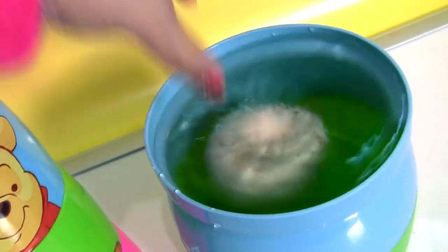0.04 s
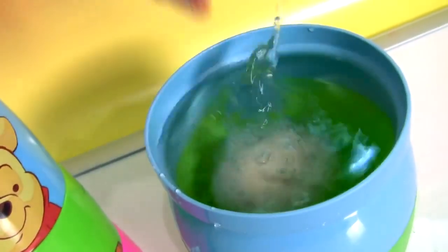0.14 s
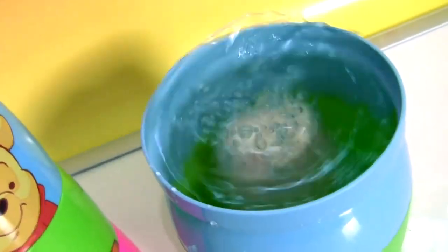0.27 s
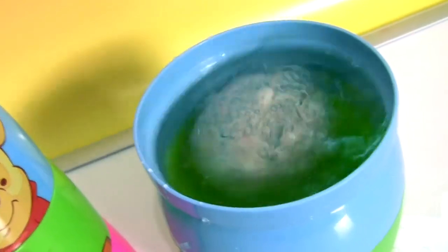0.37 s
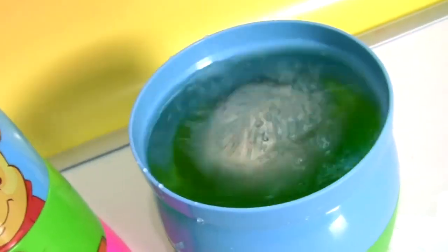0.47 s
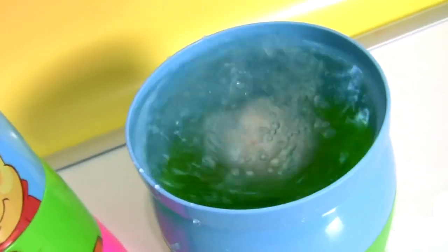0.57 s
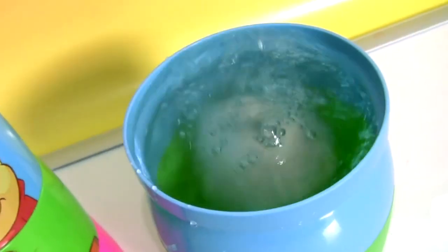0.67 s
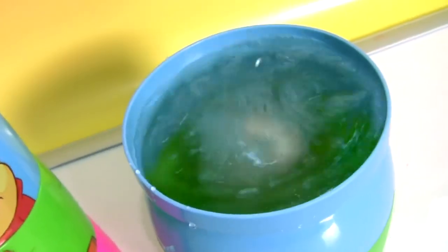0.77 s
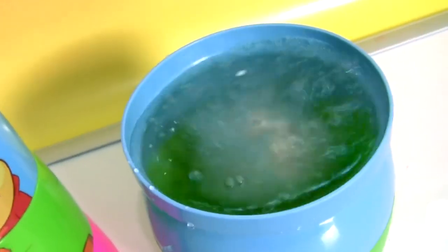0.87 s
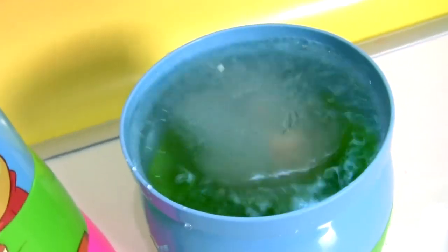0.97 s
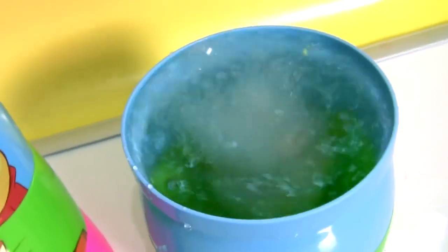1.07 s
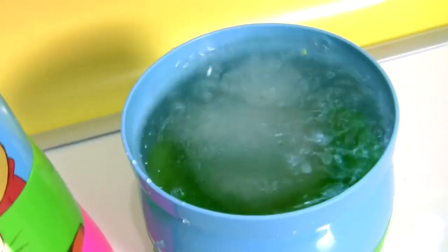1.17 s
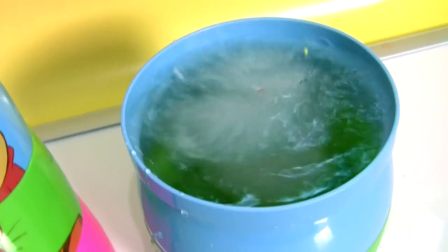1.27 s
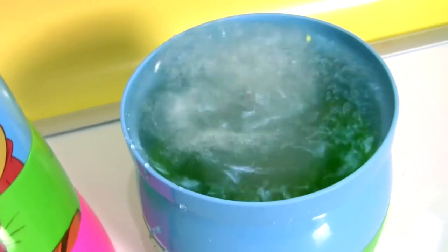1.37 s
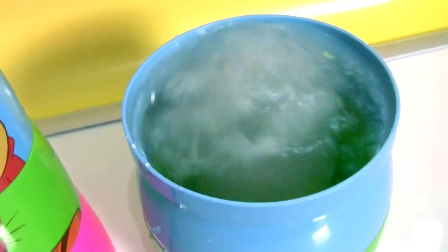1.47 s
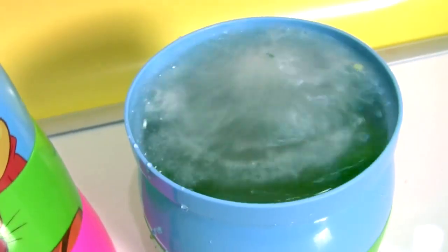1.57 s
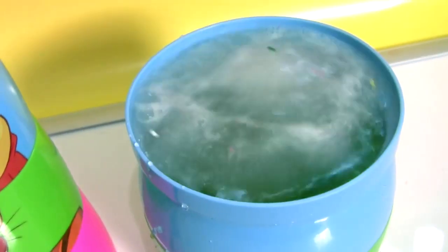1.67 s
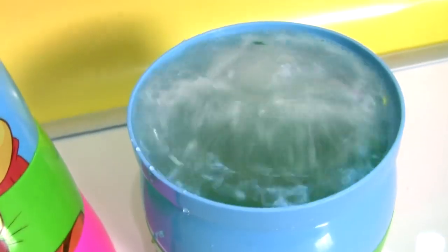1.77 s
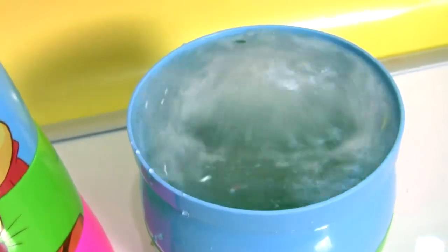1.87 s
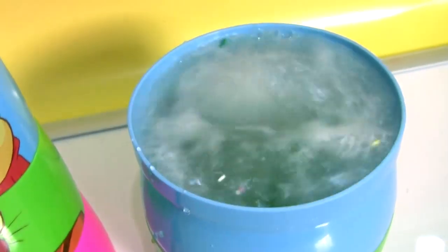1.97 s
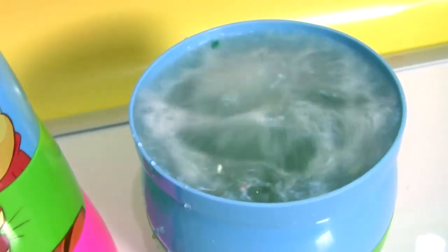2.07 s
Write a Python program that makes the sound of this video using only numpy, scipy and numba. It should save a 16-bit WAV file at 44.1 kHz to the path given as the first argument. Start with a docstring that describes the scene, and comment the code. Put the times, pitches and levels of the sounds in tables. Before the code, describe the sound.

Close up in a quiet small room, slightly to the right: a wet slap, a loud hollow plastic knock, lighter bumps and bubbly plops, tiny crackling pops, then a steadily thickening bright hiss.

```python
"""A small room, a plastic cup of water on a table, a little right of a close microphone.
A bath bomb slaps into the water and knocks on the bottom, then bumps a few more times: modes of cup and table ring.
Shaped noise makes slap and splashes; rising damped sines make single bubbles and gurgles.
Streams of tiny damped sines make the churning, the pops and a fizz that thickens.
Room reflections follow the cup and pops, over a soft room tone with three hollow resonances."""
import sys
import numpy as np
from scipy import signal
from scipy.fft import rfft, irfft
from scipy.io import wavfile
from scipy.ndimage import uniform_filter1d
from numba import njit

SR = 44100
rng = np.random.default_rng(int(sys.argv[2]) if len(sys.argv) > 2 else 0)


def to_wav(sig):
    """Store sig (one row per channel, or 1-D mono) as 16-bit WAV at the path in sys.argv[1].

    Samples outside -1..1 are clipped; the rate is SR.
    """
    pcm = np.clip(np.atleast_2d(sig), -1, 1) * 32767
    pcm = np.round(pcm).astype(np.int16)
    wavfile.write(sys.argv[1], SR, pcm.T)  # frames by channels


N = 92610
T = np.arange(N) / SR  # seconds

# Levels at the cup are set before the left-right balance and the recorder.
# room tone, spectrum of the rush: pitch_hz, level_db
ROOM_TONE_SPECTRUM = [(25, -5.5), (60, -1), (130, -0.5), (300, -5), (700, -10.5), (1500, -8), (2500, -16),
                      (7000, -29.5), (16000, -34.5)]
ROOM_TONE_DB = -62
# hollow resonances of the room: pitch_hz, width_hz, rms_level_db before the swell
ROOM_RESONANCES = [(293, 32, -63.5), (490, 73, -64.5), (733.4, 32, -64.5)]
# slow swell of those resonances: time_s, gain_db
RESONANCE_SWELL = [(0, -2.5), (.5, -7.5), (1.0, 4.5), (1.4, 1), (2.1, -3)]

# churning water, small low bubbles: time_s, rms_level_db
CHURN_LEVELS = [(.1, -67.5), (.245, -58.5), (.275, -45.5), (.36, -50), (.47, -55.5), (.7, -57), (1.0, -59),
                (1.3, -60), (1.7, -65), (2.1, -63.5)]
# colour of the churning: pitch_hz, level_db
CHURN_SPECTRUM = [(100, -13.5), (290, -9), (420, -8.5), (740, -2), (900, -9), (1300, -8.5), (1800, -22),
                  (3000, -21.5), (6000, -16)]
CHURN_PER_S, CHURN_CYCLES, CHURN_SCATTER_DB, CHURN_PHASE_RAD = 3600, 7.6, 3, 0.91

# fine fizz: time_s, rms_level_db before the surges
FIZZ_LEVELS = [(0, -76.5), (.4, -108), (.7, -74), (1.0, -77.5), (1.25, -66.5), (1.5, -60), (1.75, -56),
               (2.1, -55.5)]
# colour of the fine fizz: pitch_hz, level_db
FIZZ_SPECTRUM = [(800, -26), (2100, -9.5), (3100, 0.5), (4500, 1.5), (7000, 1), (10000, -1.5),
                 (11700, -8.5), (14000, -3), (16000, -6)]
FIZZ_PER_S, FIZZ_SCATTER_DB, FIZZ_CYCLES, FIZZ_PHASE_RAD = 7000, 0.1, 18.5, 0.71
FIZZ_SURGE_DB, FIZZ_SURGES_PER_S = 1, 45
# larger bubbles tinkling among the fizz: time_s, rms_level_db before the surges
TINKLE_LEVELS = [(.3, -94), (.62, -71.5), (.9, -67.5), (1.25, -74.5), (1.75, -66.5), (2.1, -61.5)]
TINKLE_PER_S, TINKLE_CYCLES, TINKLE_SCATTER_DB = 720, 28, 1.5

# first slap on the water, spectrum scaled to its tallest sample: pitch_hz, level_db
SLAP_SPECTRUM = [(100, -23), (450, -2), (750, 2.5), (1350, 6), (2500, -1.5), (5000, -9), (8000, -6),
                 (11500, -24), (16000, -24)]
SLAP_START_S, SLAP_DB = .1499, -23.5
SLAP_SPRAY_DB, SLAP_SPRAY_T60_S = -16, 0.0086  # noise relative to the click
# splashes against the wall: start_s, rms_level_db at the middle, length_s
SPLASH_TIMES = [(0.2415, -34, 0.003), (0.461, -56, 0.015), (0.784, -41, 0.0075), (1.11, -50.5, 0.012),
                (1.139, -60, 0.013), (1.252, -52.5, 0.037)]
# colour of the splashes: pitch_hz, level_db
SPLASH_SPECTRUM = [(300, -7), (1000, 1.5), (1550, 6.5), (2300, 1), (3300, -3), (5000, -9.5), (9000, -16),
                   (16000, -31)]
# single ringing bubbles: start_s, starting pitch_hz, level_db before attack and decay, t60_s
SINGLE_BUBBLES = [(.1652, 2780, -40.5, 0.023), (.472, 253, -41.5, 0.045), (.555, 6200, -43.5, 0.015),
                  (0.784, 3160, -38, 0.013), (0.7876, 247, -31.5, 0.06), (0.7976, 192.7, -35.5, 0.098),
                  (1.150, 195, -49.5, 0.11), (1.398, 3020, -49.5, .02), (1.446, 2340, -54, 0.032),
                  (1.5105, 630, -38, 0.015), (1.665, 2420, -43.5, 0.023), (1.932, 557, -41, 0.016)]
BUBBLE_RISE, BUBBLE_ATTACK_S = 0.052, 0.00054  # pitch climbs by twice the rise over one t60

# knocks of the ball on the cup: time_s, level_db, contact_ms, crack_db relative to the knock
BALL_KNOCKS = [(0.2440, -13, 0.33, 3.5), (0.2471, -10.5, 1.47, -1.5), (0.2542, -4.5, 0.5, -6.5),
               (0.2580, -20, 0.56, -23), (0.2788, -32.5, 0.77, -17), (0.4758, -55, 1.2, -30),
               (0.7853, -39, 0.51, -21), (0.7893, -37, 1.4, -27), (0.7989, -33.5, 1.6, -24),
               (1.1144, -47, 0.49, -12), (1.143, -38.5, 0.87, -11)]
# modes of filled cup and table, short thud and faint lasting ring: pitch_hz, level_db, t60_s
CUP_MODES = [(105.6, -45, 0.31), (143.6, -30, 0.23), (195, -32, 0.33), (226, -24, 0.094),
             (243.8, -21.5, 0.22), (292, -43.5, 0.35), (329, -40, 0.25), (334.4, -10, 0.053),
             (451, -44, 0.25), (525, -2, 0.029), (533, -36, 0.46), (594, -10.5, 0.022), (635, -30.5, 0.47),
             (692, -9.5, 0.02), (747, -17, 0.041), (1042, -37.5, 0.6), (1143, -12, 0.024),
             (1262, -15, 0.024), (1495, -11.5, 0.02), (2019, -31, 0.037), (2496, -27, 0.062)]
# colour of the gritty crack: pitch_hz, level_db
CRACK_SPECTRUM = [(100, 15), (240, 21.5), (900, 16), (1800, 3), (3500, -1.5), (5000, -11), (7500, -11),
                  (12000, -29), (16000, -40)]
CRACK_T60_S = 0.017
CUP_LOW_HZ = 173  # the small cup radiates little below this

# sharp pops at the surface: start_s, level_db before decay, pitch_hz
SURFACE_POPS = [(.308, -40.5, 6800), (0.3958, -38.5, 9700), (0.45, -41.5, 9180), (0.555, -38.5, 10420),
                (.627, -42, 9800), (.652, -39, 8230), (0.69, -43, 9600), (0.7838, -37, 7700),
                (.8955, -38.5, 8600), (.918, -42.5, 6200), (.938, -39, 6740), (0.994, -38, 8600),
                (1.061, -43, 7000), (1.029, -40, 9300)]
# colour of crackle and pop spray: pitch_hz, level_db
POP_SPECTRUM = [(2000, -2), (3500, 1.5), (6000, 1.5), (9500, 0.5), (11800, -1), (14000, 2), (16000, 0.5)]
# random crackle of small pops: time_s, rms_level_db
CRACKLE_LEVELS = [(.2, -110), (.36, -78), (.6, -67), (.9, -63), (1.2, -65), (1.6, -65), (2.1, -61)]
POPS_PER_S, POP_SCATTER_DB, POP_CYCLES, POP_PHASE_RAD = 1500, 4.5, 11.3, 1
POP_SPRAY_DB, POP_SPRAY_T60_S = -8.5, 0.0083  # spray relative to its pop

# gurgles, short runs of bubbles that climb on average: start_s, first pitch_hz, level_db
GURGLE_RUNS = [(0.559, 2100, -54), (0.558, 1154, -48), (.585, 1180, -53.5), (0.614, 2420, -55.5),
               (0.666, 2330, -55), (.73, 1200, -53), (.835, 1255, -55.5), (1.368, 3650, -56),
               (1.455, 3400, -57)]
GURGLE_S, GURGLE_T60_S = 0.024, 0.018
GURGLE_CLIMB, GURGLE_JITTER = 0.17, 0.058  # fractions of the first pitch

# colour of the room's reflections: pitch_hz, level_db
ROOM_SPECTRUM = [(60, -30), (110, 13), (190, 8.5), (340, 1.5), (700, 2.5), (1500, 5.5), (4000, 16.5),
                 (16000, 10)]
TAIL_DB, TAIL_T60_S, TAIL_TREBLE_T60_S = -9, 0.39, 0.17
EARLY_DB, EARLY_T60_S = -10, 0.017

RIGHT_DB = 3  # right channel over left for the sources at the cup
CEILING, TOP_HZ = .55, 15900  # recorder: rounding level, upper band edge


def amp(db):
    """Decibels to gain."""
    return 10 ** (np.asarray(db) / 20)


def unit(x):
    """Scale to rms 1."""
    return x / np.sqrt(np.mean(x ** 2))


def curve(rows):
    """Gain over time from (time_s, level_db) points."""
    return amp(np.interp(T, *np.array(rows).T))


def fade(t60):
    """Exponential decay, 60 dB down after t60 seconds."""
    return np.exp(-np.log(1000) * T / t60)


def add(out, at, wave):
    """Mix a wave in from a given time in seconds."""
    i = int(np.clip(at * SR, 0, N - 1))
    n = min(N - i, wave.shape[-1])
    out[..., i:i + n] += wave[..., :n]


def convolve(x, response):
    """Play x through a response."""
    return irfft(rfft(x, 2 * N) * rfft(response, 2 * N))[..., :N]


def colour(points):
    """Causal unit-energy response with the given (pitch_hz, level_db) spectrum."""
    hz, db = np.array(points).T
    size = 2048
    f = np.maximum(np.arange(size + 1) * SR / (2 * size), 1)
    cepstrum = irfft(np.log(amp(np.interp(np.log(f), np.log(hz), db))))
    # doubling the causal half of the cepstrum gives minimum phase
    causal = rfft(2 * cepstrum[1:size], 2 * size)
    one_sample_late = np.exp(-1j * np.pi * np.arange(size + 1) / size)
    h = irfft(np.exp(causal * one_sample_late))
    return h / np.sqrt(np.sum(h ** 2))


def bubble(hz, t60):
    """A damped sine whose pitch rises as the bubble nears the surface."""
    t = T[:int(t60 * SR) + 2]
    tone = np.sin(2 * np.pi * hz * t * (1 + BUBBLE_RISE * t / t60))
    decay = np.exp(-np.log(1000) * t / t60)
    attack = 1 - np.exp(-t / BUBBLE_ATTACK_S)
    return tone * decay * attack


@njit
def damped_sines(start, step, decay, size, phase):
    """Sum of ringing grains, each followed until it is about 60 dB down."""
    out = np.zeros(N)
    for k in range(len(start)):
        # two-term recursion of a damped sine
        a, b = 2 * np.cos(step[k]) * np.exp(-decay[k]), np.exp(-2 * decay[k])
        now = size[k] * np.sin(phase[k])
        then = size[k] * np.sin(phase[k] + step[k]) * np.exp(-decay[k])
        for i in range(start[k], min(N, start[k] + int(7 / decay[k]) + 2)):
            out[i] += now
            now, then = then, a * then - b * now
    return out


def grains(rate, low_hz, high_hz, cycles, scatter_db, phase):
    """A stereo stream of tiny bubbles with random time, pitch, length, strength and left-right phase."""
    draws = rng.random((60000, 5))
    when, pitch, life, size, place = draws[:int(rate * N / SR)].T
    start = (when * N).astype(int)
    hz = low_hz + (high_hz - low_hz) * pitch
    t60 = cycles / hz * 3 ** (2 * life - 1)  # a third to three times the given cycles
    strength = amp(scatter_db * np.minimum(-np.log(size), 4)) / np.sqrt(t60)
    lead = phase * np.sqrt(3) * (place - .5)
    step, decay = 2 * np.pi * hz / SR, np.log(1000) / (t60 * SR)
    return np.array([damped_sines(start, step, decay, strength, side * lead) for side in (1, -1)])


def walk(rate):
    """Random levels held 1 / rate s and smoothed twice; rms 1."""
    hold = int(SR / rate)
    steps = rng.standard_normal(N)[np.arange(N) // hold]
    return unit(uniform_filter1d(uniform_filter1d(steps, hold), hold))


def room_tone():
    """Diffuse shaped noise, plus noise through three narrow resonances that swell and sink."""
    rush = amp(ROOM_TONE_DB) * convolve(rng.standard_normal((2, N)), colour(ROOM_TONE_SPECTRUM))
    hums = np.zeros((2, N))
    for hz, width, db in ROOM_RESONANCES:
        resonance = signal.iirpeak(hz, hz / width, SR)
        hums += amp(db) * unit(signal.lfilter(*resonance, rng.standard_normal((2, N))))
    return rush + hums * curve(RESONANCE_SWELL)


def churn():
    """Many small low bubbles ring in the stirred water."""
    stream = grains(CHURN_PER_S, 151, 3340, CHURN_CYCLES, CHURN_SCATTER_DB, CHURN_PHASE_RAD)
    return unit(convolve(stream, colour(CHURN_SPECTRUM))) * curve(CHURN_LEVELS)


def fizz():
    """Thousands of tiny bursts a second merge into a hiss in small surges; larger bubbles tinkle in it."""
    stream = grains(FIZZ_PER_S, 1970, 17500, FIZZ_CYCLES, FIZZ_SCATTER_DB, FIZZ_PHASE_RAD)
    tinkle = grains(TINKLE_PER_S, 3370, 8920, TINKLE_CYCLES, TINKLE_SCATTER_DB, FIZZ_PHASE_RAD)
    hiss = unit(convolve(stream, colour(FIZZ_SPECTRUM))) * curve(FIZZ_LEVELS)
    bursts = hiss + unit(tinkle) * curve(TINKLE_LEVELS)
    return bursts * amp(FIZZ_SURGE_DB * walk(FIZZ_SURGES_PER_S))


def water():
    """The slap of entry (click and noise), short noise splashes and single ringing bubbles."""
    slap, splash_envelope, rings = np.zeros(N), np.zeros(N), np.zeros(N)
    click = T == 0
    spray = amp(SLAP_SPRAY_DB) * rng.standard_normal(N) * fade(SLAP_SPRAY_T60_S)
    add(slap, SLAP_START_S, click + spray)
    for at, db, length in SPLASH_TIMES:
        add(splash_envelope, at, amp(db) * np.sin(np.pi * np.minimum(T / length, 1)))
    for at, hz, db, t60 in SINGLE_BUBBLES:
        add(rings, at, amp(db) * bubble(hz, t60))
    smack = colour(SLAP_SPECTRUM)
    slap = amp(SLAP_DB) * convolve(slap, smack / abs(smack).max())
    splashes = convolve(splash_envelope * rng.standard_normal(N), colour(SPLASH_SPECTRUM))
    return slap + splashes + rings


def knocks():
    """Each contact pushes the cup's modes, duller the longer it lasts, with a gritty crack."""
    push, grit = np.zeros(N), np.zeros(N)
    for at, db, contact_ms, crack_db in BALL_KNOCKS:
        pulse = np.sin(np.pi * np.minimum(T * 1000 / contact_ms, 1))
        add(push, at - contact_ms / 2000, amp(db) * pulse / pulse.sum())  # centred on the knock
        add(grit, at, amp(db + crack_db) * fade(CRACK_T60_S))
    cup = sum(amp(db) * np.sin(2 * np.pi * hz * T) * fade(t60) for hz, db, t60 in CUP_MODES)
    crack = convolve(grit * rng.standard_normal(N), colour(CRACK_SPECTRUM))
    struck = convolve(push, cup) + .5 * crack  # halves the crack on top of its table level
    return signal.lfilter(*signal.butter(2, CUP_LOW_HZ, "high", fs=SR), struck)


def pops():
    """Sharp damped sines at the surface: single pops with a puff of spray, over a random crackle."""
    stream = grains(POPS_PER_S, 3800, 15400, POP_CYCLES, POP_SCATTER_DB, POP_PHASE_RAD)
    out = unit(convolve(stream, colour(POP_SPECTRUM))) * curve(CRACKLE_LEVELS)
    spray_envelope = np.zeros(N)
    for at, db, hz in SURFACE_POPS:
        add(out, at, amp(db) * np.sin(2 * np.pi * hz * T) * fade(POP_CYCLES / hz))
        add(spray_envelope, at, amp(db + POP_SPRAY_DB) * fade(POP_SPRAY_T60_S))
    spray = convolve(spray_envelope * rng.standard_normal((2, N)), colour(POP_SPECTRUM))
    return out + signal.lfilter(*signal.butter(2, 4500, "high", fs=SR), spray)


def gurgles(count=10):
    """Quick runs of bubbles whose pitches climb with some jitter."""
    out = np.zeros(N)
    for at, hz, db in GURGLE_RUNS:
        for k, (late, detune) in enumerate(rng.random((count, 2))):
            along = (k + late) / count
            pitch = hz * (1 + GURGLE_CLIMB * along + GURGLE_JITTER * (2 * detune - 1))
            add(out, at + GURGLE_S * along, amp(db) * bubble(pitch, GURGLE_T60_S))
    return out


def room(x):
    """Early reflections from the table's surroundings, then a short tail whose treble dies sooner."""
    early, low, high = rng.standard_normal((3, 2, N))
    dull = signal.butter(2, 1800 / (SR / 2))
    low, high = signal.lfilter(*dull, low), high - signal.lfilter(*dull, high)
    tail = low * fade(TAIL_T60_S) + 0.94 * high * fade(TAIL_TREBLE_T60_S)
    tail = tail * (T > .008) / np.sqrt(np.sum(fade(TAIL_T60_S) ** 2))
    near = early * fade(EARLY_T60_S) * (T > .001) / np.sqrt(np.sum(fade(EARLY_T60_S) ** 2))
    middle, side = amp(TAIL_DB) * tail + amp(EARLY_DB) * near
    stereo = middle + 0.25 * side * np.array([[1], [-1]])
    return convolve(convolve(x, colour(ROOM_SPECTRUM)), stereo)


def scene():
    """The cup stands a little to the right of the microphone; pops and room tone stay centred."""
    cup, crackle = knocks() + water() + gurgles(), pops()
    near = cup + room(cup + crackle.mean(axis=0)) + churn() + fizz()
    balance = amp(np.array([[-RIGHT_DB], [RIGHT_DB]]) / 2)
    return near * balance + crackle + room_tone()


def record(dry):
    """The recorder rounds the loudest peaks and cuts the top."""
    rounded = dry / (1 + (dry / CEILING) ** 6) ** (1 / 6)
    return signal.sosfilt(signal.ellip(10, .2, 70, TOP_HZ, fs=SR, output="sos"), rounded)


dry = scene()
out = record(dry)
to_wav(out)
```